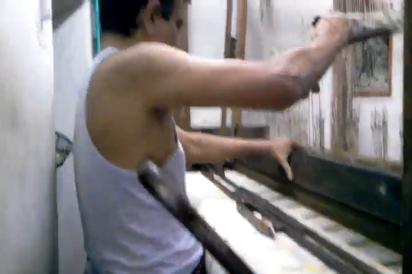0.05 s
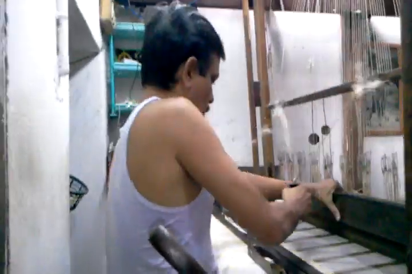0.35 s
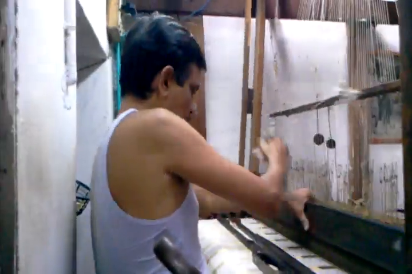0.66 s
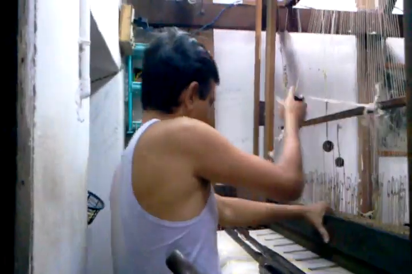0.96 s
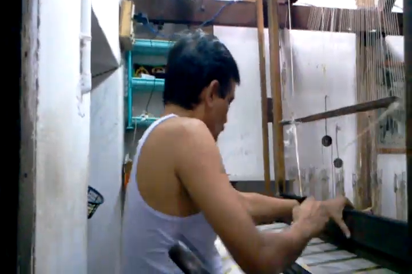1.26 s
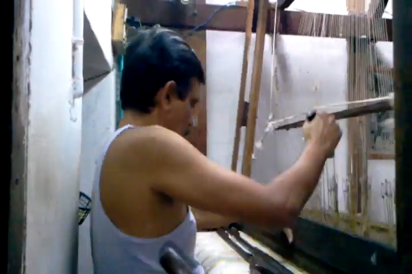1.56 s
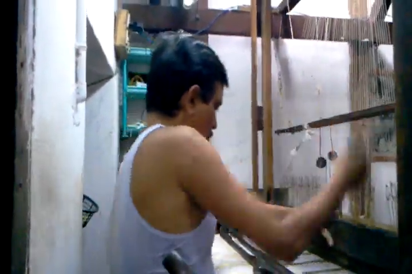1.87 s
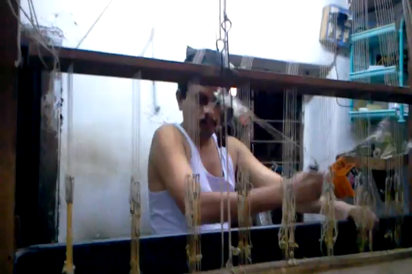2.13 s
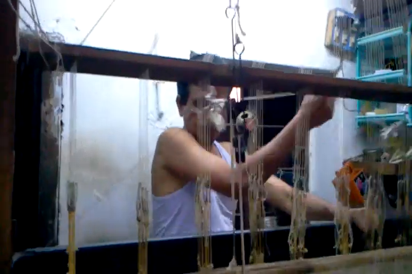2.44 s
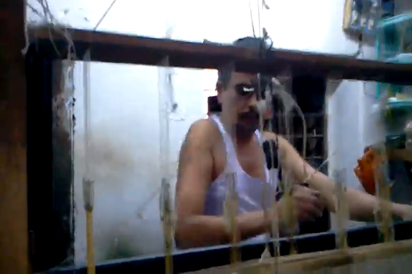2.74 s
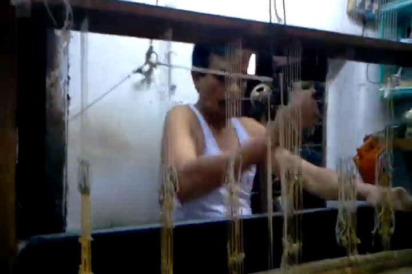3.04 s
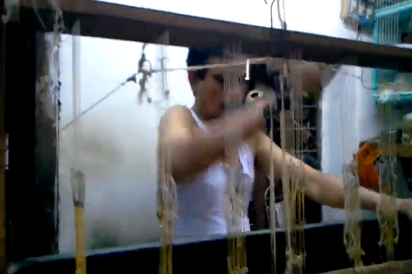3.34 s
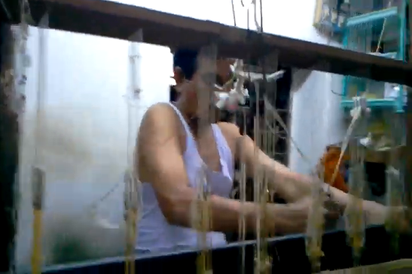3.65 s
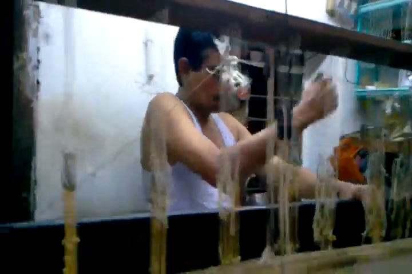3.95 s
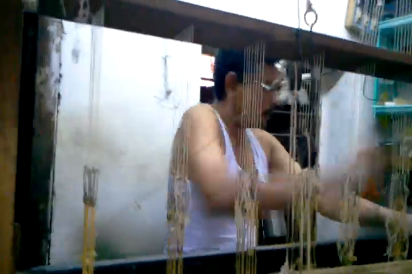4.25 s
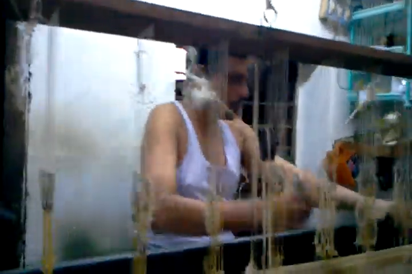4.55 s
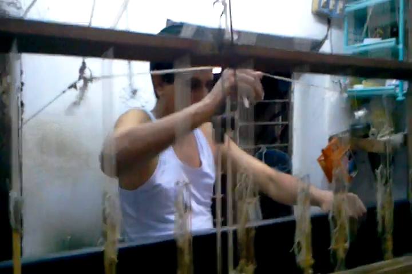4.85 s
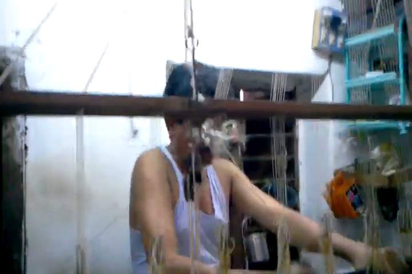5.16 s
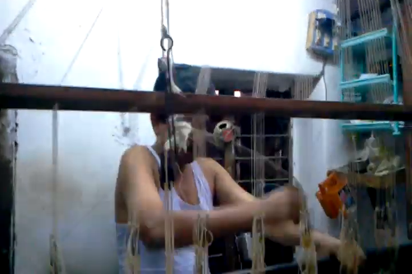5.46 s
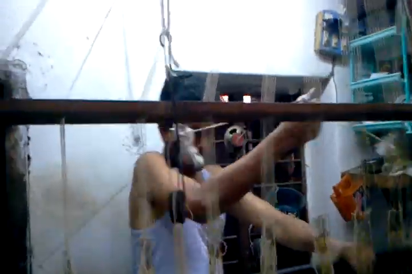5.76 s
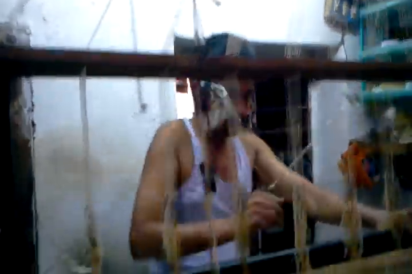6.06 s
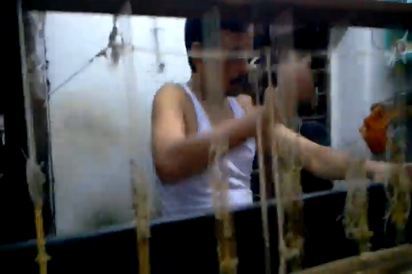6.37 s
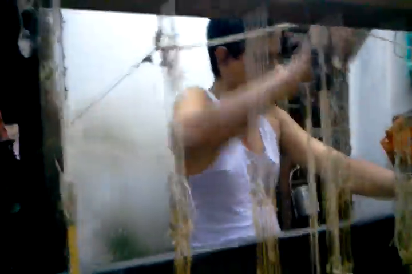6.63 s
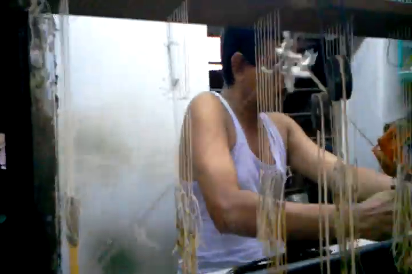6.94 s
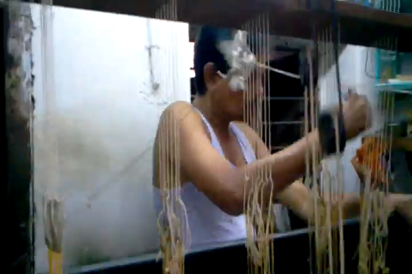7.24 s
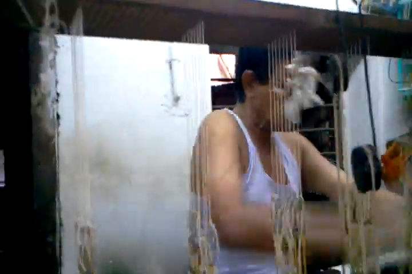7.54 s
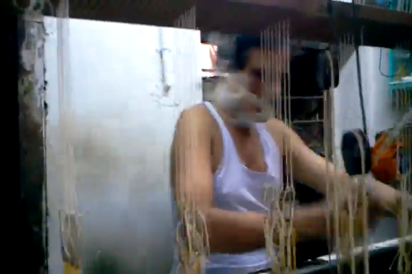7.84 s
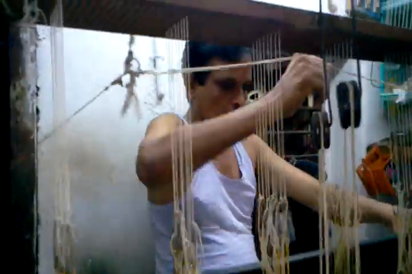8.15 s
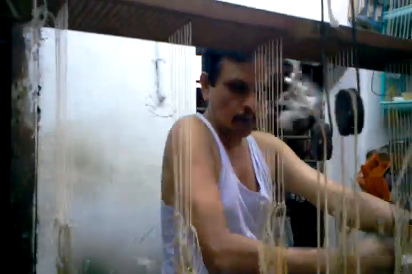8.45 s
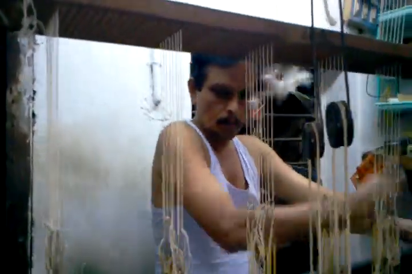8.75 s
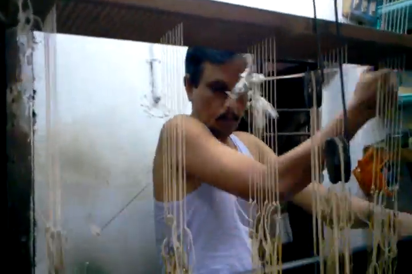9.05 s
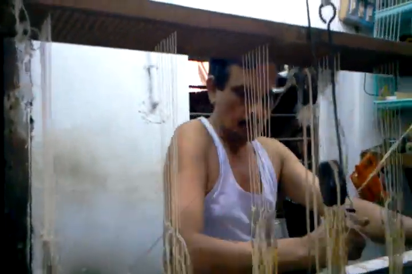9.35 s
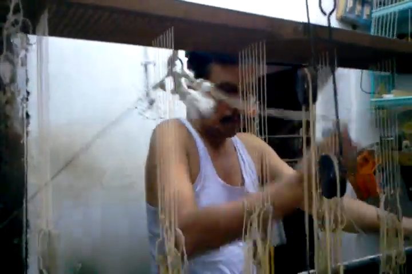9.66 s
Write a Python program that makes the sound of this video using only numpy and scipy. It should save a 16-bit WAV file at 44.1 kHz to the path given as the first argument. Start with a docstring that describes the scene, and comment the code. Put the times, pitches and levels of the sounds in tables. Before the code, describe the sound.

A wooden handloom clacks loudly in a quick, steady rhythm, with short squeals and whirrs from its shuttle, close in a small room.

```python
"""A wooden fly-shuttle handloom, worked in a small, hard-walled room close to an overloading microphone.
Each cycle: treadles squeak and click, the beater slams the cloth, the picker flings the shuttle, which
runs across and crashes into its box. Its rollers whirr one way and squeal the other; threads rustle.
Blows are noise bursts coloured by the wood; squeaks and squeals are friction tones.
The sound drops out once for about half a second."""
import sys
import numpy as np
from scipy import signal
from scipy.fft import rfft, irfft, next_fast_len
from scipy.io import wavfile

SR = 44100
rng = np.random.default_rng(int(sys.argv[2]) if len(sys.argv) > 2 else 0)


def materialize(psi):
    """Save the field psi as 16-bit PCM at rate SR to the path in sys.argv[1].

    A 1-D psi becomes a single channel; in a 2-D psi each row is a channel.
    """
    bounded = np.clip(np.atleast_2d(psi).T, -1, 1)
    quanta = np.round(bounded * 32767).astype(np.int16)
    wavfile.write(sys.argv[1], SR, quanta)


N = 432180
TIME = np.arange(N) / SR

# beater on the cloth, first and second treadle in turn: t/s, level/dB, rattle t60/s, body/dB
BEATS = [(0.35, 2, .09, -6), (1.175, 7, 0.13, -9), (2.003, 4.5, 0.08, -10), (2.81, 3, .22, -6),
         (3.627, 0, .11, -1), (4.448, -1, 0.22, -5.5), (5.275, 2, 0.11, -4), (6.08, 4.5, 0.22, -6.5),
         (6.906, -1, .15, -3.5), (7.723, 4, .27, -7), (8.548, -1, .1, 2), (9.402, 4, 0.091, -2.5)]
# shuttle whirring along the race: t/s, level/dB
RUNS = [(1.472, -15.5), (3.111, -12), (4.729, -12.5), (6.381, -11.5), (8.03, -11)]
# rollers on the way back: t/s, starting f/Hz, sag/(Hz/s), level/dB
SQUEALS = [(.712, 1362, -300, 0), (3.983, 1445, 430, 1.5), (5.631, 1443, 330, 2), (7.279, 1485, 880, 0.5),
           (8.926, 1463, 560, 1)]
# first treadle, heddle sticks clacking: t/s, level/dB
CLACKS = [(.293, -0.5), (1.945, 1.5), (3.578, 4), (5.218, -2), (6.852, -4.5), (8.489, -4.5)]
# second treadle: t/s, creak length/s, creak/dB, stick jostle/dB
CREAKS = [(1.112, 0.035, -6.5, -11.5), (4.385, 0.062, -19, -13), (6.02, .11, -15.5, -12.5),
          (7.686, 0.049, -7.5, -11.5), (9.346, .045, -19.5, -8.5)]
# ring of the frame: f/Hz, level/dB
FRAME_SPECTRUM = [(40, -14.5), (200, -20), (700, -13.5), (1400, -9), (2100, -5.5), (2600, -9.5), (3600, -6),
                  (4600, 2.5), (5500, 3.5), (6300, -13.5), (8000, -21.5)]
# room decay: f/Hz, t60/s
ROOM_T60 = [(100, 0.48), (1000, 0.42), (2500, 0.28), (5000, 0.24), (8000, 0.2)]


def from_db(db):
    """Decibels to gain."""
    return 10 ** (np.asarray(db) / 20)


def unit_rms(x):
    """Scale to unit rms."""
    return x / np.sqrt(np.mean(x ** 2) + 1e-20)


def in_time(points):
    """Breakpoints to a curve at every sample."""
    return np.interp(TIME, *np.transpose(points))


def at_hz(points, hz):
    """Read a table on a log-frequency axis."""
    freqs, values = np.transpose(points)
    return np.interp(np.log(hz + 1), np.log(freqs), values)


def drift(rate_hz):
    """Unit-rms wander through rate_hz random points a second."""
    return unit_rms(np.interp(TIME * rate_hz, np.arange(N // 10), rng.standard_normal(N // 10)))


def rough_noise(spread_db, rate_hz):
    """Unit-rms noise with a flickering level."""
    return unit_rms(rng.standard_normal(N) * from_db(spread_db * drift(rate_hz)))


def gate(start_s, length_s, edge_s):
    """Gate with linear edges."""
    return np.clip(np.minimum(TIME - start_s, start_s + length_s - TIME) / edge_s, 0, 1)


def low_pass(x, hz, order):
    """Butterworth low-pass."""
    return signal.sosfilt(signal.butter(order, hz, fs=SR, output="sos"), x + 1e-18)


def colour(x, spectrum, size=4096):
    """Minimum-phase filter of unit energy with the given spectrum."""
    hz = np.arange(size // 2 + 1) * SR / size
    cepstrum = irfft(np.log(from_db(at_hz(spectrum, hz))))
    cepstrum[1:size // 2] *= 2
    cepstrum[size // 2 + 1:] = 0
    response = irfft(np.exp(rfft(cepstrum)))
    return signal.oaconvolve(x, response / np.linalg.norm(response))[:N]


def resonance(x, hz, width_hz):
    """Two-pole resonance, peak gain 1."""
    r = np.exp(-np.pi * width_hz / SR)
    feedback = [1, -2 * r * np.cos(2 * np.pi * hz / SR), r * r]
    return signal.lfilter(np.array([1, 0, -1]) * (1 - r * r) / 2, feedback, x + 1e-18)


def room_echoes(x, wet_db, gap_s, size=SR // 2):
    """Bare plaster walls prolong a tone with dense echoes; treble dies first."""
    age_s, hz = TIME[:size], np.arange(size // 2 + 1) * SR / size
    white, tail = np.exp(2j * np.pi * rng.random(len(hz))), 0
    edges_hz = [0, 300, 800, 1800, 3500, 6000, SR]
    for low, high in zip(edges_hz, edges_hz[1:]):
        band = irfft(white * (hz >= low) * (hz < high), size)
        tail += band * np.exp(-np.log(1000) * age_s / at_hz(ROOM_T60, (low + high) / 2))
    tail *= np.clip(age_s / gap_s - .5, 0, 1)
    echoes = signal.oaconvolve(x, tail / np.linalg.norm(tail))[:N]
    wet = from_db(wet_db)
    return (x + wet * echoes) / np.sqrt(1 + wet ** 2)


def room_diffusion(x, wet_db, gap_s):
    """A knock's energy spreads through the room and returns as noise, dying band by band."""
    size = next_fast_len(N + SR // 10)
    hz = np.arange(size // 2 + 1) * SR / size
    spectrum, white = rfft(x, size), rfft(rng.standard_normal(size))
    edges_hz = [0, 1200, 3800, 6000, SR]
    tail = 0
    for low, high in zip(edges_hz, edges_hz[1:]):
        band = (hz >= low) * (hz < high)
        decay = np.exp(-2 * np.log(1000) / (SR * at_hz(ROOM_T60, (low + high) / 2)))
        power = irfft(spectrum * band, size)[:N] ** 2
        energy = signal.lfilter([1 - decay], [1, -decay], power + 1e-18)
        tail += np.sqrt(energy) * unit_rms(irfft(white * band, size)[:N])
    delayed = np.pad(tail, (round(gap_s * SR), 0))[:N]
    wet = from_db(wet_db)
    return (x + wet * delayed) / np.sqrt(1 + wet ** 2)


def blows(rows, spectrum, crack_db, crack_s, uneven_db, lead_s, lead_db, wet_db, size=SR // 2):
    """Slack takes up, wood cracks home, loose parts chatter. Rows: t/s, level/dB, t60/s, body/dB."""
    chatter = rough_noise(uneven_db, rate_hz=350)
    force, body = np.zeros(N), np.zeros(N)
    for start_s, level_db, t60_s, body_db in rows:
        first = max(0, round(start_s * SR) - size // 10)
        span = slice(first, first + size)
        age_s = TIME[span] - start_s
        lead = from_db(lead_db) * np.exp(-abs(age_s) / lead_s)
        crack = from_db(crack_db) * np.exp(-abs(age_s) / crack_s)
        rattle = np.exp(-np.log(1000) * abs(age_s) / t60_s)
        burst = chatter[span] * from_db(level_db) * np.where(age_s < 0, lead, crack + rattle)
        force[span] += burst
        body[span] += burst * (from_db(body_db) - 1)   # a squarer blow moves more heavy timber
    force += low_pass(body, hz=2516, order=1)
    return colour(room_diffusion(force, wet_db, gap_s=.006), spectrum)


def thread_rustle(floor_db=-32.5):
    """The warp rustles throughout, more in the reed on the backswing and in the heddles on treadle two."""
    # threads: f/Hz, level/dB
    spectrum = [(30, -3), (100, -4.5), (500, -4.5), (1000, -5.5), (1400, -2), (2100, -3), (2600, -5),
                (3600, -4.5), (4700, 9.5), (5700, 4), (6500, -4), (8000, -12)]

    def brushes(beats, delay_s, half_s):
        """A swell centred delay_s after each beat."""
        return sum(gate(t + delay_s - half_s, 2 * half_s, half_s / 2) for t, *_ in beats)

    reed = from_db(-31.5) * brushes(BEATS, delay_s=.12, half_s=.1)
    heddles = from_db(-26.5) * brushes(BEATS[1::2], delay_s=-.031, half_s=.11)
    level = from_db(floor_db) + reed + heddles
    return level * colour(rough_noise(spread_db=2, rate_hz=120), spectrum)


def pivot_squeaks(chirp_hz=5200, creak_hz=1517, whistle_hz=4600, jitter=.0068, flutter_db=3):
    """Short, shaky friction tones swell and fade as treadles and rollers turn."""
    # stray short squeaks and whistles of the loom: t/s, length/s, f/Hz, level/dB
    stray_squeaks = [(0.249, 0.067, 3054, -20.5), (0.674, 0.049, 3150, -13.5), (1.879, 0.037, 3070, -23.5),
                     (4.332, .03, 5620, -26), (6.007, 0.03, 6668, -8.5), (7.195, .085, 4560, -5),
                     (7.223, 0.031, 1680, -16), (7.649, 0.034, 6740, -20.5), (9.312, 0.037, 6700, -28)]
    chirps = [(t - .03, .04, chirp_hz, -24) for t, _ in CLACKS]
    creaks = [(t, length_s, creak_hz, db) for t, length_s, db, _ in CREAKS]
    octaves = [(t, length_s, 2 * hz, db - 11) for t, length_s, hz, db in creaks]
    spin_ups_s = [t + .048 for t, _ in RUNS] + [t - .027 for t, *_ in SQUEALS]
    whistles = [(t, .045, whistle_hz, -16) for t in spin_ups_s]
    shaky_time_s = np.cumsum(1 + jitter * drift(500)) / SR
    tones = np.zeros(N)
    for start_s, length_s, hz, level_db in chirps + creaks + octaves + whistles + stray_squeaks:
        span = slice(round(start_s * SR), round((start_s + length_s) * SR))
        phase = 2 * np.pi * hz * shaky_time_s[span]
        envelope = np.sqrt(2) * np.sin(np.linspace(0, np.pi, len(phase)))
        tones[span] += from_db(level_db) * envelope * np.sin(phase)
    return tones * from_db(flutter_db * drift(200))


def frame_clatter(t60_s=.031, bounce_s=.0185, jostle_s=.021, ticks_per_s=6):
    """Heddle sticks bounce on treadle one and jostle on treadle two; loose fittings knock and tick."""
    # loose fittings: t/s, level/dB
    knocks = [(1.087, -17), (1.715, 3), (1.852, -15), (4.876, -3.5), (6.986, -10), (7.032, -11),
              (9.269, -18.5)]
    # each bounce weaker and duller
    bounces = [(t + k * bounce_s, db - 5 * k, t60_s, -10.5 + 9.5 * k)
               for t, db in CLACKS for k in range(3)]
    jostles = [(t + (k + .5) * jostle_s, db, .08, 3.5) for t, *_, db in CREAKS for k in range(2)]
    ticks_s = np.cumsum(rng.exponential(1 / ticks_per_s, 90))
    ticks_db = rng.normal(-30.5, 3.5, 90)
    ticks = [(t, db) for t, db in zip(ticks_s, ticks_db) if t < TIME[-1]]
    fittings = [(t, db, t60_s, -4) for t, db in knocks + ticks]
    return blows(bounces + jostles + fittings, FRAME_SPECTRUM, crack_db=-4.5, crack_s=.0014,
                 uneven_db=2.5, lead_s=.003, lead_db=-21, wet_db=-2.5, size=SR // 4)


def shuttle_whirr(bumps_db=4, lurch_db=2):
    """Rollers bump over the warp and sound the hollow shuttle, which lurches from side to side."""
    # shuttle body: f/Hz, width/Hz, level/dB
    modes = [(535, 80, -14), (1000, 340, -18), (1413, 56, -5.5), (1574, 400, -14.5), (2030, 150, -9),
             (2770, 140, -11), (3670, 440, -10.5), (4605, 180, 1), (4970, 460, -5.5), (5560, 230, -12.5),
             (6340, 270, -17)]
    envelope = sum(from_db(db) * gate(t, length_s=.14, edge_s=.026) for t, db in RUNS)
    bumps = rng.standard_normal(N) * from_db(bumps_db * drift(260) + lurch_db * drift(90))
    ring = sum((-1) ** k * from_db(db) * resonance(bumps, hz, width_hz)
               for k, (hz, width_hz, db) in enumerate(modes))
    return envelope * unit_rms(ring)


def roller_squeals(length_s=.128, turn_hz=55, flutter_db=3.5, wander_rad=.5, judder_db=-7):
    """A dry axle sticks and slips, gliding in pitch, while the dragging roller judders on the race."""
    # stick-slip tone: harmonic number, level/dB
    partials = [(1, -2.5), (2, -6), (3, .5), (4, -6.5), (5, -18)]
    glide_hz = in_time([point for t, hz, sag, _ in SQUEALS
                        for point in ((t, hz), (t + length_s, hz - sag * length_s))])
    pitch_hz = glide_hz * (1 + .016 * drift(700) + .011 * drift(110))
    phase = 2 * np.pi * np.cumsum(pitch_hz) / SR
    # off-centre roller: slips come early and late once a turn
    turn_rad = .75 * np.sin(2 * np.pi * turn_hz * TIME + 2.2 * drift(45))
    tone = 0
    # each partial flutters in level and wanders in phase, roughening the squeal
    for harmonic, db in partials:
        level = from_db(db + flutter_db * drift(220))
        tone += level * np.sin(harmonic * phase + turn_rad + wander_rad * drift(200))
    judder = colour(rough_noise(spread_db=4.5, rate_hz=300), FRAME_SPECTRUM)
    grip = sum(from_db(db) * gate(t, length_s, edge_s=.009) for t, *_, db in SQUEALS)
    return grip * (unit_rms(tone) + from_db(judder_db) * judder)


def shuttle_landings(mouth_db=-2, ram_s=.015, ram_db=-4.5):
    """The shuttle meets the box mouth, then rams the picker at the far end."""
    # landings: t/s, level/dB, rattle t60/s, body/dB
    landings = [(.002, 5.5, 0.082, -5.5), (0.819, -9.5, 0.26, 5), (1.634, 7.5, 0.13, -3),
                (3.264, 4, 0.23, 0.5), (4.11, -0.5, 0.14, 5.5), (4.905, 5.5, 0.23, -3),
                (5.745, -3, 0.18, 4.5), (6.544, 6.5, 0.2, 2), (7.362, -4, 0.23, 9), (8.183, 4, 0.24, 3.5),
                (9.063, -4, 0.094, 10.5)]
    # ring of the box: f/Hz, level/dB
    spectrum = [(40, -19), (200, -15), (500, -15), (730, -10), (950, -10), (1500, -5), (2500, -8),
                (3600, -4.5), (4700, 1.5), (5500, -0.5), (6300, -11), (8000, -21)]
    hits = [(t + lag_s, db + step_db, t60_s, body_db) for t, db, t60_s, body_db in landings
            for lag_s, step_db in [(0, mouth_db), (ram_s, ram_db)]]
    return blows(hits, spectrum, crack_db=-8.5, crack_s=.0024,
                 uneven_db=7, lead_s=.0027, lead_db=-5.5, wet_db=0)


def picker_throws(snatch_t60_s=.06, snatch_body_db=11.5):
    """The picker flings the shuttle; before some throws its cord snatches up slack."""
    # throws: t/s, level/dB, rattle t60/s, body/dB
    throws = [(.577, 1, .27, -4), (1.378, 6.5, .18, -2), (3.011, 5.5, 0.24, -1.5), (3.847, 4.5, .2, 5.5),
              (4.654, 2.5, 0.29, 2), (5.502, 9, .22, -6), (6.292, 5, .27, -2.5), (7.139, 12, .2, -5),
              (7.941, 5.5, .2, -2.5), (8.787, 9.5, .17, -3.5), (9.630, 10, .13, -6)]
    # cord snatches: t/s, level/dB
    snatches = [(3.79, -9.5), (5.441, -2.5), (8.731, -6.5)]
    # ring of the picker: f/Hz, level/dB
    spectrum = [(40, -31), (200, -20.5), (700, -17.5), (1450, -7.5), (2100, -7.5), (2600, -9.5),
                (3600, -5.5), (4600, 0.5), (5500, 1), (6300, -10), (8000, -16.5)]
    hits = throws + [(t, db, snatch_t60_s, snatch_body_db) for t, db in snatches]
    return blows(hits, spectrum, crack_db=-6.5, crack_s=.006,
                 uneven_db=6, lead_s=.0035, lead_db=-10.5, wet_db=2)


def beater_slams():
    """The beater slams the cloth and rattles."""
    # ring of the beater: f/Hz, level/dB
    spectrum = [(40, -36.5), (200, -26), (700, -13), (1400, -7), (1750, -10.5), (2100, -4), (2600, -11),
                (3600, -7), (4600, 0.5), (5500, -3), (6300, -13.5), (8000, -22)]
    return blows(BEATS, spectrum, crack_db=-4, crack_s=.0088,
                 uneven_db=4.5, lead_s=.0073, lead_db=-8.5, wet_db=1)


def scene():
    """Knocks, friction tones and rustle, mono; parts reach the walls from their own places."""
    knocks = from_db(2) * (beater_slams() + picker_throws() + shuttle_landings()) + frame_clatter()
    whirr = room_echoes(shuttle_whirr(), wet_db=-.5, gap_s=.0061)
    squeals = room_echoes(roller_squeals(), wet_db=-5, gap_s=.0035)
    squeaks = room_echoes(pivot_squeaks(), wet_db=-7, gap_s=.018)
    return (knocks + whirr + squeals + squeaks + thread_rustle())[None]


def record(dry):
    """The microphone overloads on the blows; rumble and top are cut; the sound drops out once."""
    # dropout: t/s, gain/dB
    dropout = [(0, 0), (2.148, -0.5), (2.153, -24), (2.2, -26), (2.22, -120), (2.775, -120), (2.79, -11),
               (2.84, -11), (2.9, -4), (2.98, -.5), (9.8, -.5)]
    ceiling, hardness, band_edge_hz = .8, 3.2, 8834
    oversampled = signal.resample_poly(dry, 2, 1, axis=-1)
    clipped = oversampled / (1 + abs(oversampled / ceiling) ** hardness) ** (1 / hardness)
    dull = low_pass(signal.resample_poly(clipped, 1, 2, axis=-1), hz=7540, order=8)
    rumble = low_pass(dull, hz=10, order=1)
    interrupted = (dull - rumble) * from_db(in_time(dropout))
    top_cut = signal.firwin(161, band_edge_hz - 200, fs=SR, window=("kaiser", 8))
    return signal.oaconvolve(interrupted, top_cut[None], mode="same")


dry = scene()
out = record(dry)
materialize(out)
```